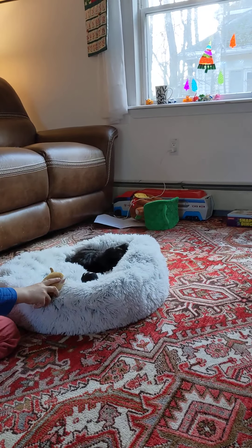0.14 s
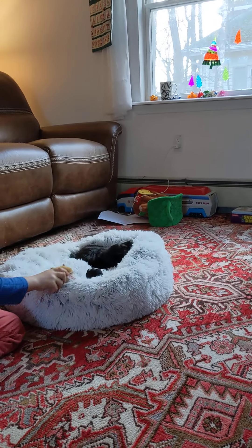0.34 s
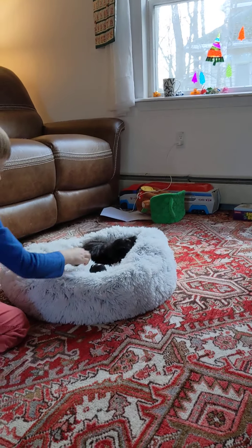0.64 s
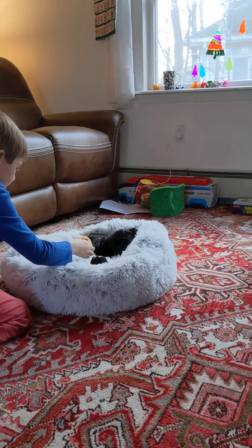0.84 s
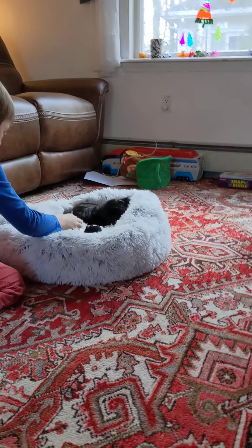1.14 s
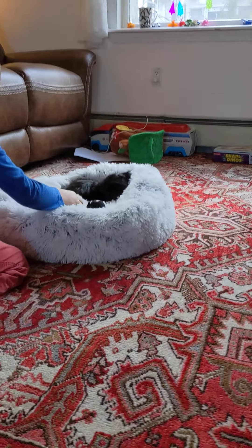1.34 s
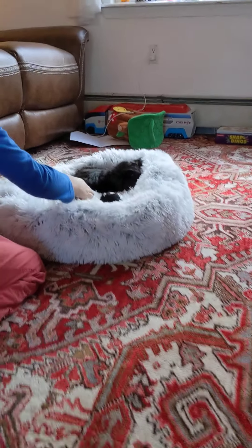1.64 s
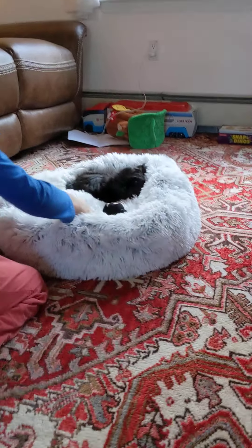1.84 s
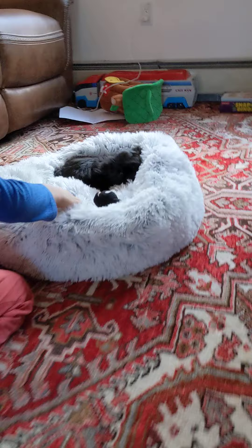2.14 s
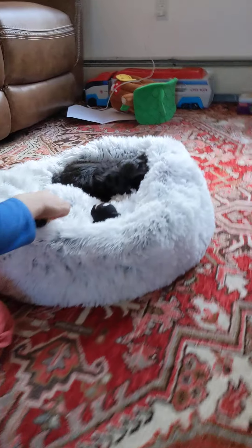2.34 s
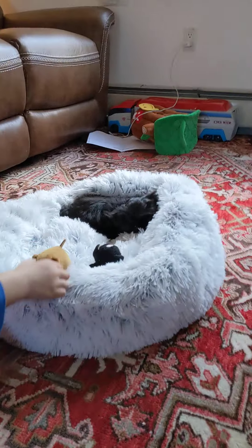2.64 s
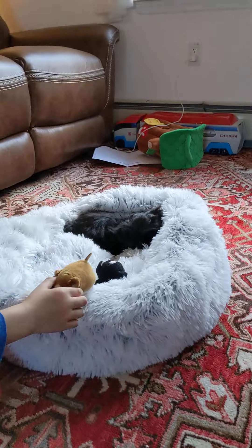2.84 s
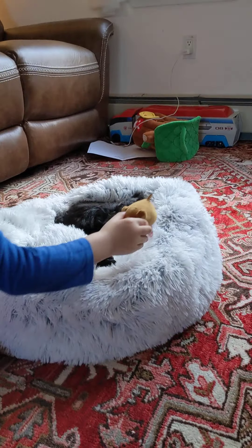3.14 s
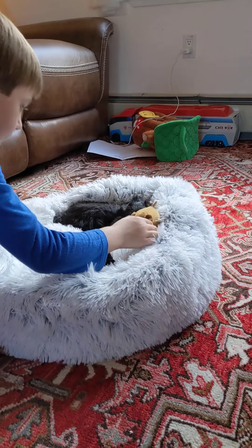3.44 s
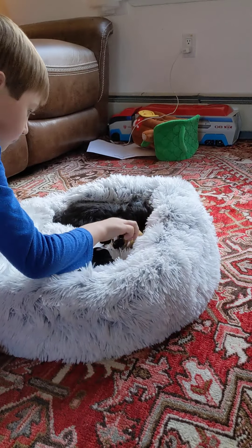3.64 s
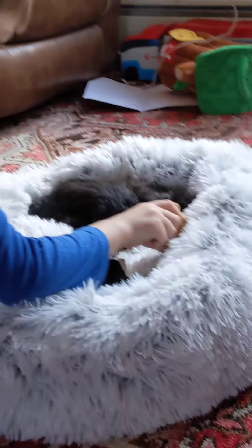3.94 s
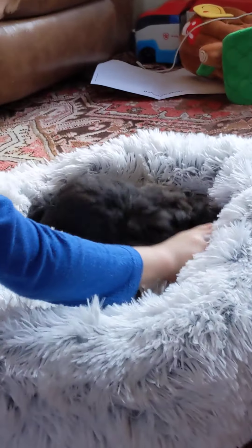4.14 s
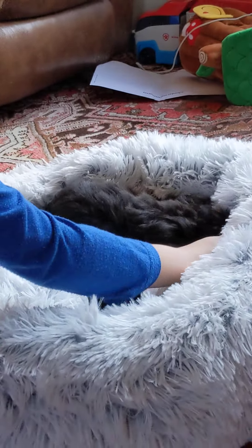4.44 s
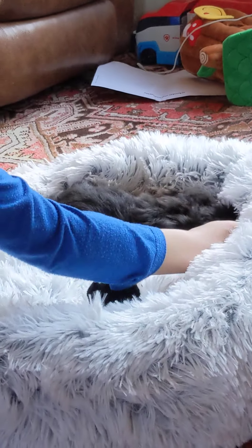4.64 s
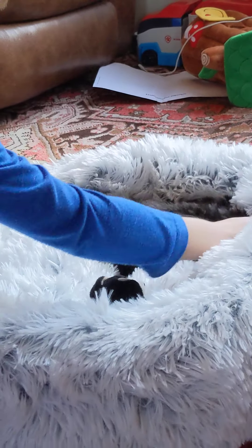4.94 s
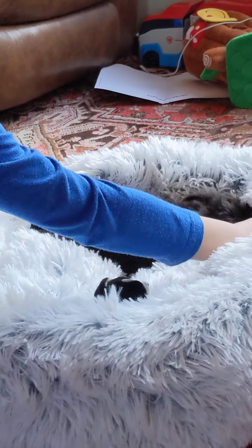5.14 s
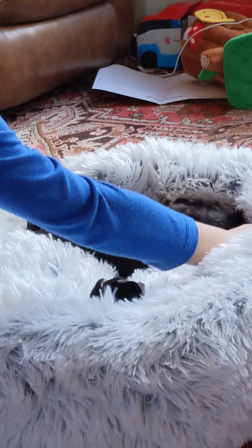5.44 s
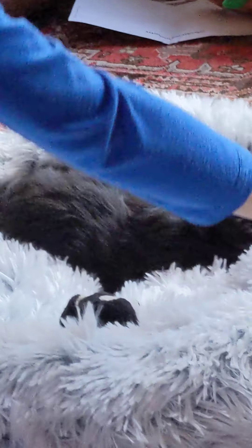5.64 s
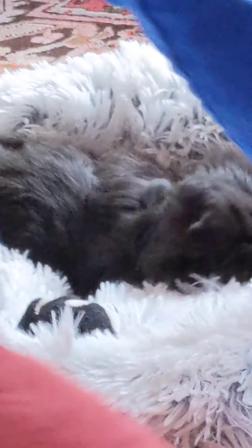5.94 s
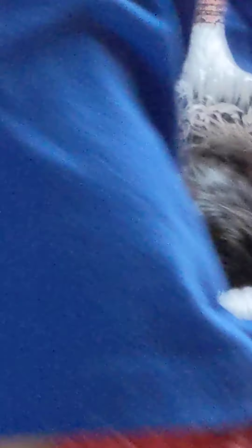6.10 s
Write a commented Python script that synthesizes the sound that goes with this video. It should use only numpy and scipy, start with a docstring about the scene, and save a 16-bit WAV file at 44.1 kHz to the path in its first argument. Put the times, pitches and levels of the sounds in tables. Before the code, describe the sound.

Soft, uneven rustling of plush, fur and sleeve in a quiet room, dotted with dry clicks, hollow knocks and phone handling thumps.

```python
"""A hand moves about a puppy in a plush pet bed: fur and sleeve rustle as fibres slip, and something
small and dry in the hand ticks and knocks. These sounds fill a living room. The phone is held close by:
a finger brushes and taps its case at the right microphone, and its movements rumble in both.
A faint hum lies under the room's air."""
import sys
import numpy as np
from scipy import signal
from scipy.fft import rfft, irfft
from scipy.io import wavfile

SR = 44100
rng = np.random.default_rng(int(sys.argv[2]) if len(sys.argv) > 2 else 0)


def wav_record(signal):
    """Record a signal, one row per channel, as 16-bit PCM in the file named by sys.argv[1]."""
    frames = np.transpose(np.atleast_2d(signal))
    bounded = np.clip(frames, -1, 1)
    # unit amplitude maps onto the largest positive 16-bit level
    quanta = np.round(bounded * 32767).astype(np.int16)
    wavfile.write(sys.argv[1], SR, quanta)


N = 276410
TIME_S = np.arange(N) / SR
FREQ_HZ = np.maximum(np.fft.rfftfreq(N, 1 / SR), 1)


def undb(db):
    """Decibels to gain."""
    return 10 ** (np.asarray(db) / 20)


def unit(x):
    """Scale to rms 1."""
    return x / np.sqrt(np.mean(x ** 2))


def curves(table):
    """Per-sample curves from (time_s, value, ...) rows."""
    time_s, *columns = np.transpose(table)
    return [np.interp(TIME_S, time_s, column) for column in columns]


def at_hz(points, hz):
    """Interpolate (freq_hz, value) points over log frequency."""
    freq_hz, value = np.transpose(points)
    return np.interp(np.log(hz), np.log(freq_hz), value)


def colour(x, spectrum):
    """Filter by (freq_hz, gain_db) points."""
    return irfft(rfft(x) * undb(at_hz(spectrum, FREQ_HZ)), N)


def wander(rate_hz):
    """Smooth random curve, spread near 1."""
    knots_s = np.arange(0, N / SR + 1, 1 / rate_hz)
    return np.interp(TIME_S, knots_s, rng.standard_normal(len(knots_s))) * np.sqrt(3 / 2)


def add(track, start_s, sound):
    """Mix a sound in at start_s."""
    i = int(start_s * SR)
    track[i:i + len(sound)] += sound[:N - i]


def bands(hz, body_hz=1000, top_hz=5200):
    """Body, middle and top weights, summing to 1."""
    body = 1 / (1 + (hz / body_hz) ** 4)
    top = 1 / (1 + (top_hz / hz) ** 8)
    return body, 1 - body - top, top


def impulse(gain_db):
    """Minimum-phase impulse response from a gain per bin."""
    cepstrum = irfft(np.log(undb(gain_db)))
    half = len(cepstrum) // 2
    cepstrum[1:half] *= 2
    cepstrum[half + 1:] = 0
    return irfft(np.exp(rfft(cepstrum)))


def thud(level_db, pitch_hz, q, edge_hz):
    """One damped mode; the soft contact rolls off above edge_hz."""
    hz = np.maximum(np.fft.rfftfreq(4096, 1 / SR), 1)
    mode_loss = 1 + (q * (hz / pitch_hz - pitch_hz / hz)) ** 2
    contact_loss = 1 + (hz / edge_hz) ** 4
    return impulse(level_db - 10 * np.log10(mode_loss * contact_loss))


def slips(per_s, spread_db):
    """Friction: countless tiny slips, a few stronger than the rest."""
    hits = rng.random(N) < per_s / SR
    strength = undb(spread_db * np.minimum(rng.exponential(size=N), 5))
    return unit(hits * strength * rng.standard_normal(N))


def gestures(rows, attack_s, swell, release_s):
    """Envelope of movements, summed in power; each rises over attack_s plus swell times its length."""
    power = np.zeros(N)
    for start_s, length_s, level_db in rows:
        t = TIME_S[:int((length_s + 8 * release_s) * SR)]
        rise = np.minimum(t / (attack_s + swell * length_s), 1) ** 2
        fall = np.exp(-np.maximum(t - length_s, 0) / release_s)
        add(power, start_s, (undb(level_db) * rise * fall) ** 2)
    return np.sqrt(power)


# freq_hz, gain_db
AIR_SPECTRUM = [(30, -53), (55, -2), (80, 6.5), (120, -10), (300, -8.5), (520, -11), (1000, -23),
                (2300, -24.5), (4500, -29.5), (6800, -29), (11000, -40), (16000, -40)]


def air(level_db=-58, hum_hz=54, hum_db=-65, waver_hz=2, waver_db=1):
    """Room air with a low drone, wide in the treble, over a faint wavering hum."""
    mid, side = (colour(rng.standard_normal(N), AIR_SPECTRUM) for _ in range(2))
    side = colour(side, [(60, -13.5), (300, -7), (1000, 1.5)])
    hiss = unit(np.array([mid + side, mid - side])) * undb(level_db)
    hum = np.sin(2 * np.pi * np.cumsum(hum_hz + waver_hz * wander(4.4)) / SR)
    return hiss + unit(hum) * undb(hum_db + waver_db * wander(5.1))


# freq_hz, gain_db
RUMBLE_SPECTRUM = [(20, -31), (36, -12), (52, 6), (100, 1), (150, -2), (250, -9), (380, -22.5),
                   (900, -37.5), (3000, -56)]
# start_s, length_s, level_db
GRIP_SHIFTS = [(.02, 0.027, -52.5), (.25, 0.05, -34), (.32, 0.065, -30), (.465, 0.064, -35),
               (.74, 0.08, -49.5), (1.16, 0.059, -38.5), (1.3, 0.22, -50), (1.675, 0.046, -36),
               (1.82, 0.064, -42.5), (2.185, 0.14, -41.5), (2.49, 0.02, -50), (5.95, 0.11, -53),
               (6.055, .08, -41.5), (6.16, 0.12, -53)]


def grip_rumble(gain_db=-1, side_db=-19, tremble_db=-59.5):
    """A shifting, trembling grip shakes the phone, nearly alike at both microphones."""
    mid, side = (unit(colour(rng.standard_normal(N), RUMBLE_SPECTRUM)) for _ in range(2))
    side *= undb(side_db)
    jolts = gestures(GRIP_SHIFTS, attack_s=0.011, swell=0.038, release_s=0.032)
    shake = np.hypot(jolts, undb(tremble_db))
    return np.array([mid + side, mid - side]) * shake * undb(gain_db)


# freq_hz, gain_db
BRUSH_SPECTRUM = [(88, -17), (150, 0.5), (240, 0), (398, -8), (649, 1), (1260, -3.5), (1940, 1),
                  (3200, -5.5), (5150, -8.5), (6510, -4), (8400, -9), (10400, -28), (16000, -35)]
# start_s, length_s, level_db
FINGER_SLIDES = [(1.675, .02, -29.5), (2.02, 0.21, -36), (2.157, 0.078, -19), (2.305, 0.039, -23.5),
                 (2.492, .02, -39), (2.573, 0.022, -33)]


def finger_brush(uneven_db=2.5):
    """Skin slides jerkily over the microphone port: a dry hiss that stops at lift-off."""
    friction = slips(per_s=27000, spread_db=0.5) * undb(uneven_db * wander(110))
    hiss = unit(colour(friction, BRUSH_SPECTRUM))
    return hiss * gestures(FINGER_SLIDES, attack_s=0.0017, swell=0.55, release_s=0.0052)


# start_s, level_db, pitch_hz, edge_hz
CASE_TAPS = [(1.4465, 11, 515, 870), (1.6887, 24, 254, 9500), (2.147, -2, 6400, 9000),
             (2.2135, 6, 220, 900), (2.2597, 20, 340, 836), (2.505, 2.5, 900, 9250),
             (2.793, -18, 2520, 9100), (4.925, -26, 4000, 10900), (5.184, -16.5, 2500, 9100)]


def finger_taps(q=0.64, rebound_hz=1100):
    """A fingertip meets the case with a dead thud; the case gives and springs back."""
    out = np.zeros(N)
    for start_s, level_db, pitch_hz, edge_hz in CASE_TAPS:
        add(out, start_s, thud(level_db, pitch_hz, q, edge_hz))
    rebound = (rebound_hz - 1j * FREQ_HZ) / (rebound_hz + 1j * FREQ_HZ)  # all-pass: swings both ways
    return irfft(rfft(out) * rebound, N)


# freq_hz, t60_s
ROOM_DECAY = [(150, 0.14), (500, 0.45), (1400, 0.29), (3500, 0.34), (7000, 0.28), (14000, 0.21)]


def room(x, alike_hz=750, build_s=0.0055):
    """Diffuse tail: energy builds and dies band by band; long waves are alike at both microphones."""
    hz, frames_s, cells = signal.stft(x, SR, nperseg=256)
    t = frames_s[:len(frames_s) // 8]
    t60_s = at_hz(ROOM_DECAY, np.maximum(hz, 1))[:, None]
    fade = np.exp(-2 * np.log(1000) * t / t60_s) * (1 - np.exp(-(t / build_s) ** 2))
    fade /= fade.sum(1, keepdims=True)
    energy = signal.fftconvolve(np.abs(cells) ** 2, fade, axes=1)[:, :len(frames_s)]
    apart, right = signal.stft(rng.standard_normal((2, N)), SR, nperseg=256)[2]
    alike = 1 / (1 + (hz[:, None] / alike_hz) ** 2)
    left = alike * right + np.sqrt(1 - alike ** 2) * apart
    field = np.array([left, right]) / np.std(right)
    return signal.istft(field * np.sqrt(np.abs(energy)))[1][:, :N]


# time_s, top_octave_db, left_db
PHONE_AIM = [(.6, -19, -1.5), (1.3, -8, -8), (1.75, -1.5, -5), (2.3, 2, -5.5), (3.3, -5.5, -1.5),
             (4.1, -8, -1), (4.6, -13, -1.5), (5.5, -3.5, -3)]


def microphones(direct, tail, lag_samples=13):
    """Direct sound is earlier and stronger on the right; aiming at the bed favours the top octave."""
    top_octave_db, left_db = curves(PHONE_AIM)
    left = undb(left_db) * np.pad(direct, (lag_samples, 0))[:N]
    stereo = np.array([left, direct]) + tail
    top_octave = irfft(rfft(stereo) * bands(FREQ_HZ, top_hz=7960)[2], N)
    return stereo + top_octave * (undb(top_octave_db) - 1)


# start_s, level_db, pitch_hz
TICK_RINGS = [(3.997, -41, 2370), (3.997, -41, 2870), (4.712, -41.5, 1218), (4.712, -39, 2120),
              (4.712, -49.5, 3450)]


def rings(gain_db=-2, t60_s=0.43, waver_hz=110):
    """Thin, rough rings linger after two of the ticks."""
    out = np.zeros(N)
    decay = np.exp(-np.log(1000) * TIME_S / t60_s)
    for start_s, level_db, pitch_hz in TICK_RINGS:
        phase = 2 * np.pi * np.cumsum(pitch_hz + waver_hz * wander(214)) / SR
        add(out, start_s, undb(level_db + gain_db) * np.sin(phase) * decay)
    return out


# start_s, level_db, pitch_hz
BED_KNOCKS = [(0.476, 16, 506), (0.483, 14, 361), (.652, 6.5, 690), (.68, 7, 644), (.995, 6, 514),
              (1.084, 6.5, 564), (1.199, 20, 233), (1.2966, 13, 300), (2.079, 10.5, 480), (3.096, 10, 166),
              (3.682, 10, 508), (3.718, 4.5, 525), (3.998, 3, 600), (4.268, 2.5, 590), (4.366, -1, 484),
              (4.432, 6, 605), (4.625, -1.5, 435), (4.652, -3, 600), (5.298, 6.5, 485), (5.47, 9, 667),
              (5.613, 11, 640), (5.643, 12.5, 730), (5.648, 13.5, 830), (5.892, 6.5, 550),
              (5.927, 5.5, 544)]


def knocks(gain_db=3, q=6, edge_hz=1000, linger_db=-6, linger_q=28):
    """Soft contacts in the bed ring briefly and hollow; a weaker, narrow ring nearby lingers."""
    out = np.zeros(N)
    for start_s, level_db, pitch_hz in BED_KNOCKS:
        add(out, start_s, thud(level_db + gain_db, pitch_hz, q, edge_hz))
        linger_hz = pitch_hz * (1 + rng.standard_normal() / 20)
        add(out, start_s + 0.01, thud(level_db + gain_db + linger_db, linger_hz, linger_q, edge_hz))
    return out


# freq_hz, gain_db
TICK_SPECTRUM = [(60, -23), (200, -20.5), (500, -7), (2700, -5), (4200, -7), (7000, -5.5), (8500, -5.5),
                 (10500, -14), (15500, -18)]
# start_s, level_db, ring_hz, body_db, top_db, room_db
DRY_TICKS = [(0.4777, -12.5, 2370, 1, 16.5, 9), (0.5125, 8.5, 2540, -13, -2.5, -4),
             (0.5326, -10, 1720, 8, 10, 2), (0.651, 0, 6270, -15, -13, 4.5),
             (0.6646, 4.5, 1180, -4, 0, -18), (0.681, -1, 1180, -29, -15, -3),
             (0.9048, -7, 1860, 8.5, 0.5, -1), (0.9672, -9, 1250, 15, -12, 6.5),
             (0.9958, -9.5, 1210, 24, 4, 2.5), (1.1392, -1.5, 2430, -39, 4.5, 4.5),
             (1.1978, 13.5, 1420, 10, -7.5, 2), (1.2966, 9.5, 1620, 11, -16, -0.5),
             (1.4, -0.5, 1340, -2, -22, 2.5), (1.8169, -4.5, 4030, -19, -23, 4.5),
             (1.903, 2.5, 1630, -2, -9.5, 3), (2.017, -3.5, 2790, -5, -19, -5),
             (3.1817, -11, 4240, -4, 0.5, 5.5), (3.3197, -4.5, 6800, 8, 10, 4),
             (3.4076, -4.5, 1460, -2, -3.5, 5.5), (3.4925, 0, 1720, 6, 0, 2.5),
             (3.5385, -2.5, 2030, -17, -11, 0), (3.678, 0, 1990, -15, -3, 5),
             (3.7182, -2, 2350, -34, -2, 2), (3.8168, -12.5, 2590, 13, -7, 4.5),
             (3.9958, 4.5, 2800, -12, 0, 4), (4.2676, -7.5, 2000, 5, -7, 5.5),
             (4.287, -4.5, 1690, -19, -9, -3), (4.4373, -9, 1820, 6.5, -0.5, 1),
             (4.499, -20, 2500, 5, -1, 5), (4.7115, -7, 3400, 0, -18, 6), (5.2654, -7, 3440, 17, -4, -2),
             (5.297, -2, 2260, 11, -2.5, -0.5), (5.3761, 3.5, 2260, 6.5, -1, 4),
             (5.4055, 8.5, 1230, -6, -19, -16), (5.5762, -1.5, 3400, -2, -5.5, 4),
             (5.642, -7.5, 1190, 26, -14, -6.5), (5.72, -1, 1340, 10.5, -7, 3.5),
             (5.8648, -5.5, 3400, 10.5, -3.5, 4.5), (5.9254, -1.5, 1440, -3, -11, 4),
             (6.1677, 0, 3030, -4, 1, -1.5)]


def ticks(gain_db=1, ring_db=6, ring_octaves=0.42, echo_db=-13, crumble_ratio=1.64, crumble_s=0.00093):
    """A sharp release and brief crumbling through one broad resonance; returns direct and room feed."""
    direct, room_feed = np.zeros(N), np.zeros(N)
    hz = np.maximum(np.fft.rfftfreq(1024, 1 / SR), 1)
    body, _, top = bands(hz)
    base_db = at_hz(TICK_SPECTRUM, hz) + gain_db
    t = TIME_S[:SR // 100]
    for start_s, level_db, ring_hz, body_db, top_db, room_db in DRY_TICKS:
        burst = rng.standard_normal(len(t)) * t * np.exp(-2 * t / crumble_s)
        burst *= crumble_ratio / np.linalg.norm(burst)
        burst[0] = 1  # the release
        resonance_db = ring_db * np.exp(-(np.log2(hz / ring_hz) / ring_octaves) ** 2)
        shape_db = base_db + level_db + body_db * body + top_db * top + resonance_db
        direct_db = shape_db + 1.5 * top  # keeps the treble that carpet and sofa soak up
        tick = np.convolve(burst / np.linalg.norm(burst), impulse(direct_db))
        add(direct, start_s, tick)
        add(room_feed, start_s, impulse(shape_db + room_db))
        for delay_s in rng.uniform(0.004, 0.017, size=3):  # floor and furniture echoes
            add(direct, start_s + delay_s, tick * undb(echo_db))
    return direct, room_feed


# start_s, length_s, level_db, body_db, top_db
HAND_STROKES = [(0.17, 0.19, -60.5, -16, 3.5), (0.459, 0.012, -37.5, 4, -8), (0.552, 0.096, -46, -0.5, 0),
                (0.65, 0.023, -53, -9, 11), (0.708, 0.049, -65, 12, -5), (0.987, 0.033, -45, -2, -6),
                (1.071, 0.064, -50, 3.5, 7.5), (1.185, 0.021, -26.5, -12, -1),
                (1.243, 0.061, -34, -10, -20), (1.31, 0.13, -44.5, -2.5, -6),
                (1.535, 0.079, -55, 12.5, 6.5), (1.598, .44, -51.5, -1.5, 0.5), (2.031, 0.17, -42, -2, -8),
                (2.472, 0.098, -58, 2, 1), (2.974, 0.041, -46, -9, -2), (3.065, 0.37, -49.5, -3, -3.5),
                (3.299, 0.16, -43.5, -8, 1), (3.47, 0.077, -44, -9, -1), (3.647, 0.051, -41.5, -7, -5.5),
                (3.77, 0.11, -55, -3.5, -8), (4.035, 0.15, -56, -5, -11), (4.275, 0.075, -52, -17, -6.5),
                (4.412, 0.075, -52.5, -9, -6), (4.556, 0.073, -53, 1.5, -22), (4.976, 0.2, -65.5, 8.5, -2),
                (5.273, .08, -52, -12, -15), (5.39, 0.09, -42.5, -14.5, -10.5),
                (5.57, 0.044, -35, -7, -8.5), (5.73, 0.15, -51.5, -2, -4), (5.948, 0.096, -52, 8.5, -6.5),
                (6.03, 0.1, -42.5, 4.5, -5), (6.153, 0.064, -46, -1, -8)]
# time_s, level_db
ARM_CONTACT = [(.1, -67), (.8, -63), (1.5, -60), (2.4, -61), (2.9, -61), (3.95, -69), (4.55, -75.5),
               (4.95, -97), (5.3, -70)]


def hand_effort():
    """Body, middle and top envelopes of strokes through the plush and the arm leaning on the bed."""
    start_s, length_s, level_db, body_db, top_db = np.transpose(HAND_STROKES)
    leaning = undb(curves(ARM_CONTACT)[0])
    envelopes = []
    for band_db in (body_db, 0, top_db):
        rows = zip(start_s, length_s, level_db + band_db)
        strokes = gestures(rows, attack_s=0.0061, swell=0.14, release_s=0.043)
        envelopes.append(np.hypot(strokes, leaning))
    return envelopes


# freq_hz, gain_db
FUR_SPECTRUM = [(60, -33), (150, -3), (280, 13), (550, 6), (900, 8), (1500, 10.5), (2600, 6), (4400, -5),
                (7000, -15.5), (8500, -17), (10500, -27.5), (13000, -24), (15500, -39)]


def snags(effort, per_s=45, gain_db=-11, limit_db=-40):
    """Tufts catch and let go with a soft crackle, louder with effort up to a limit."""
    releases = (rng.random(N) < per_s / SR) * rng.uniform(-1.04, 1, N)
    crackle = unit(colour(releases, FUR_SPECTRUM))
    return crackle * np.minimum(effort, undb(limit_db)) * undb(gain_db)


def rustle(envelopes, gain_db=-3, uneven_db=3):
    """Fur and cloth slip fibre by fibre; the hand catches and lets go unevenly."""
    friction = slips(per_s=2300, spread_db=4) * undb(uneven_db * wander(70))
    spectrum = rfft(colour(friction, FUR_SPECTRUM))
    layers = [unit(irfft(spectrum * band, N)) for band in bands(FREQ_HZ)]
    return undb(gain_db) * sum(envelope * layer for envelope, layer in zip(envelopes, layers))


def scene():
    """Sounds at the bed fill the room; the finger on the case stays dry and on the right."""
    body, middle, top = hand_effort()
    rubbing = rustle((body, middle, top))
    knocking = knocks()
    ticking, tick_feed = ticks()
    direct = rubbing * undb(-2) + knocking + ticking + rings() + snags(middle)
    tail = room(rubbing * undb(-1) + knocking * undb(-5.5) + tick_feed * undb(-3))
    finger = (finger_brush() + finger_taps()) * undb([[-45], [0]])
    return microphones(direct, tail) + finger + grip_rumble() + air()


def record(dry):
    """The phone cuts the deepest bass and the top."""
    low_cut_hz, high_cut_hz = 32, 16200
    highpass = signal.butter(4, low_cut_hz, "high", fs=SR, output="sos")
    lowpass = signal.ellip(8, 0.2, 70, high_cut_hz, fs=SR, output="sos")
    return signal.sosfilt(lowpass, signal.sosfilt(highpass, dry))


dry = scene()
out = record(dry)
wav_record(out)
```